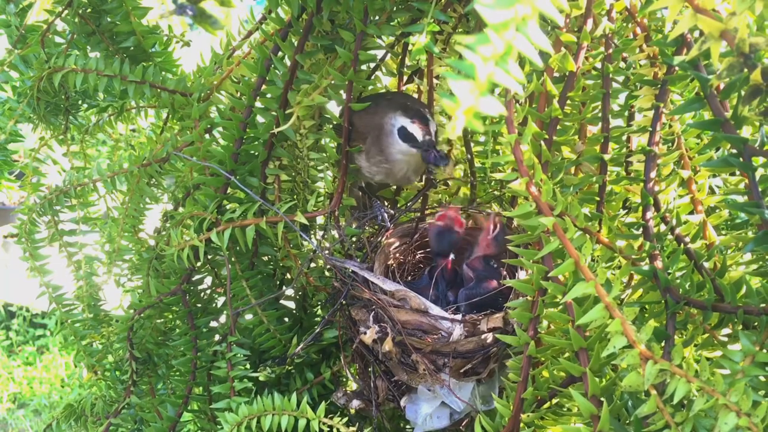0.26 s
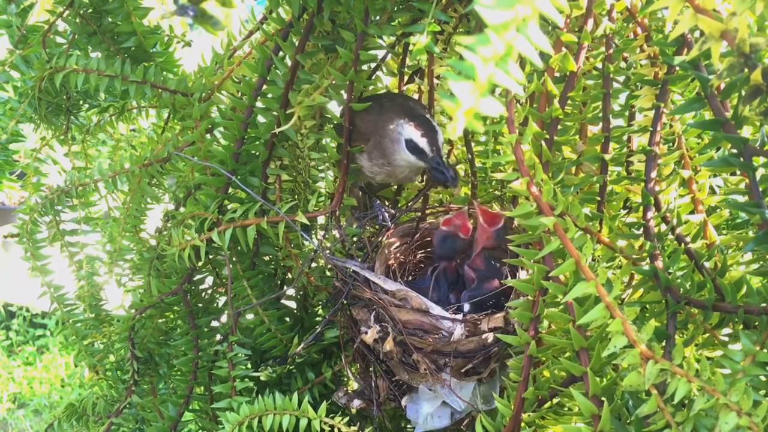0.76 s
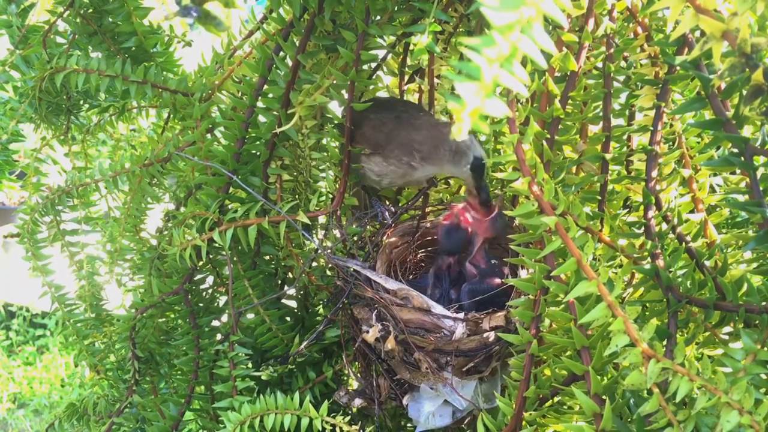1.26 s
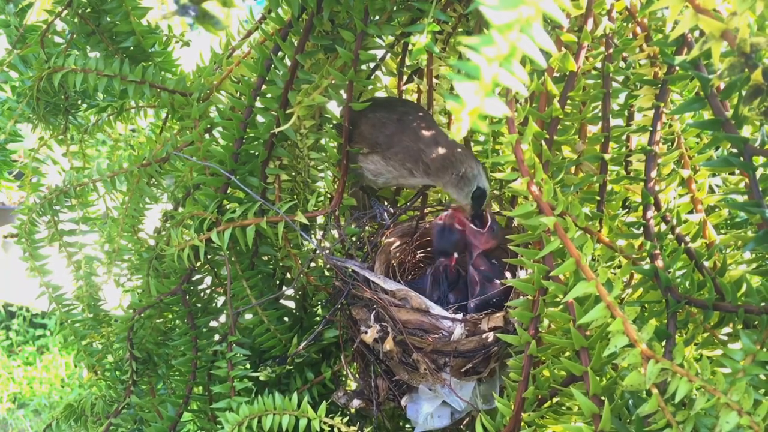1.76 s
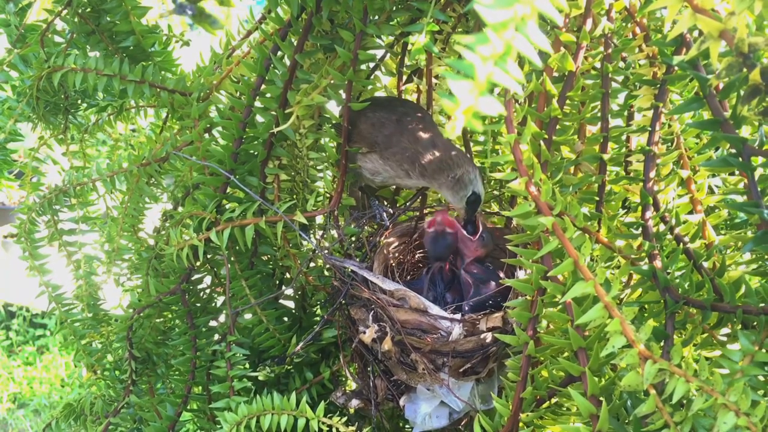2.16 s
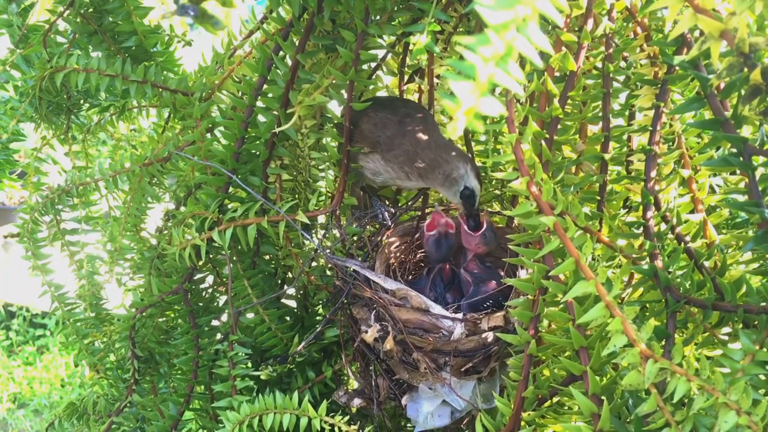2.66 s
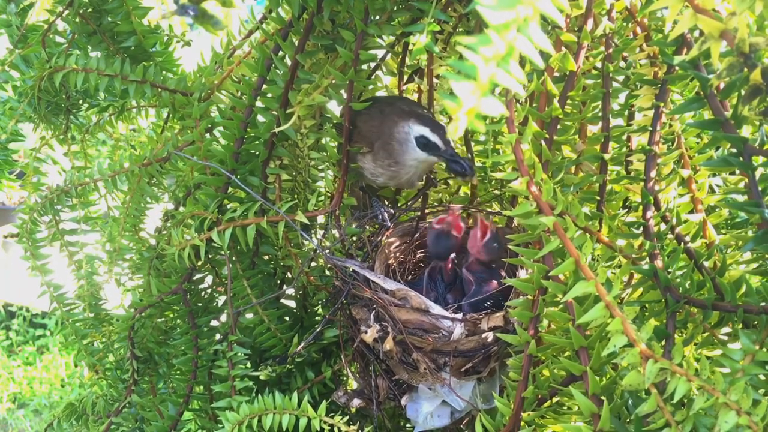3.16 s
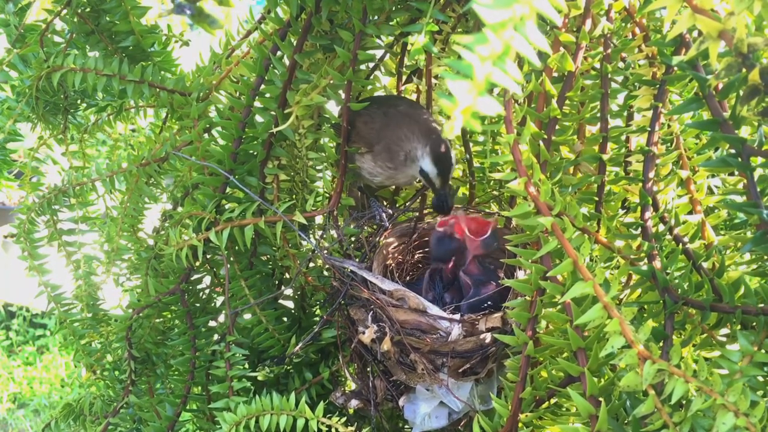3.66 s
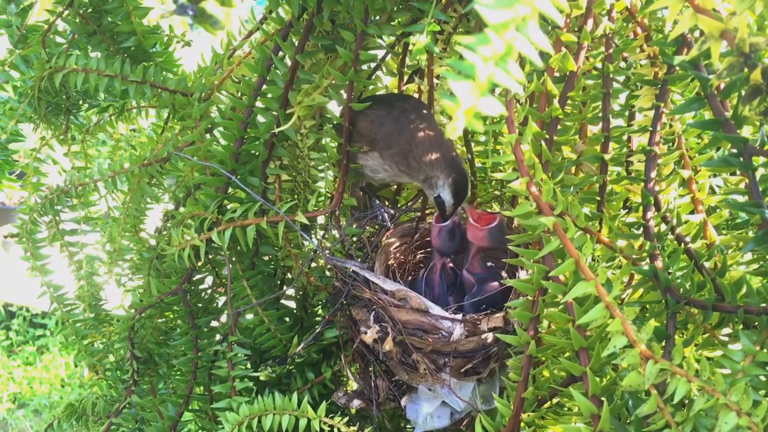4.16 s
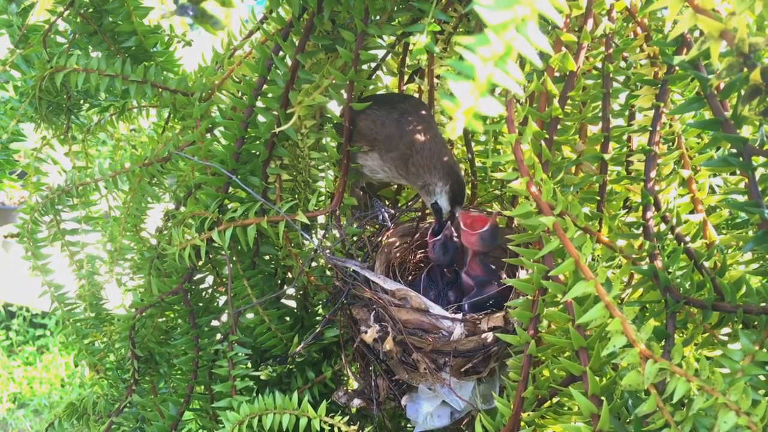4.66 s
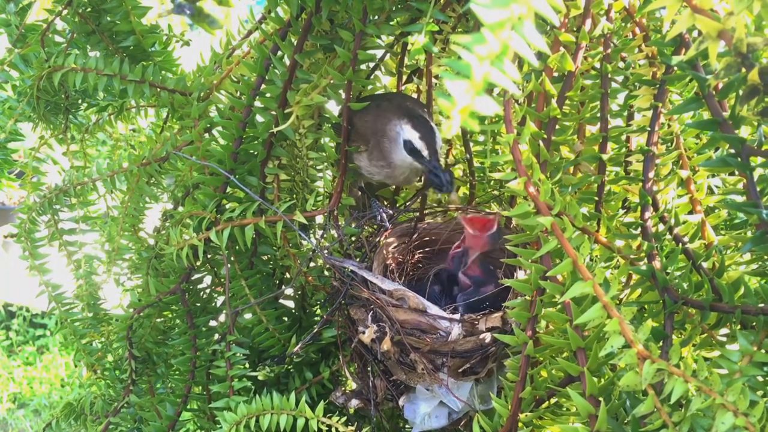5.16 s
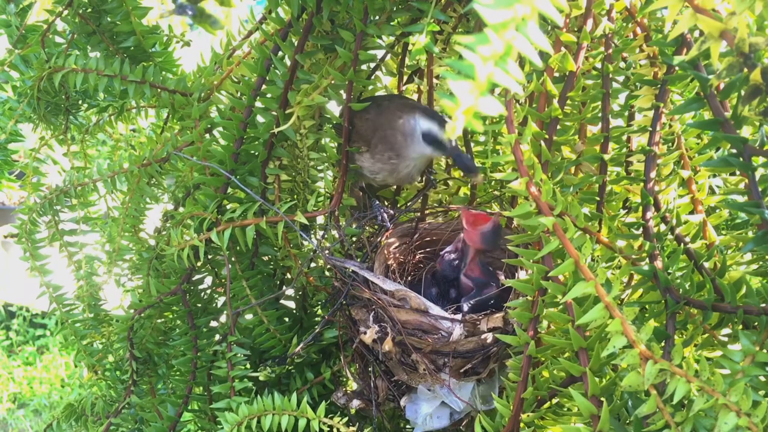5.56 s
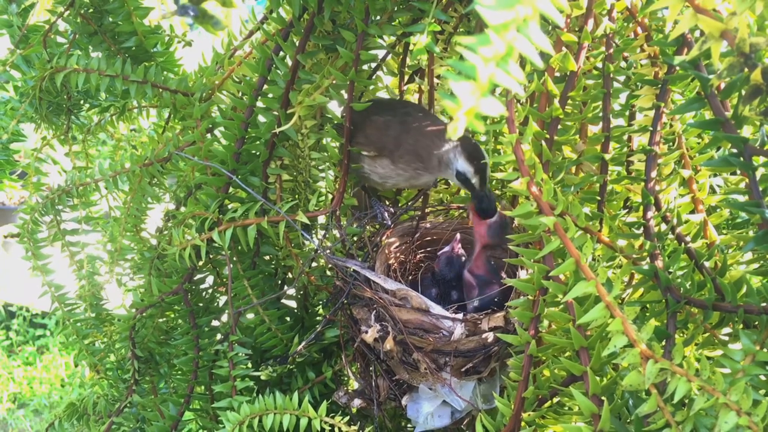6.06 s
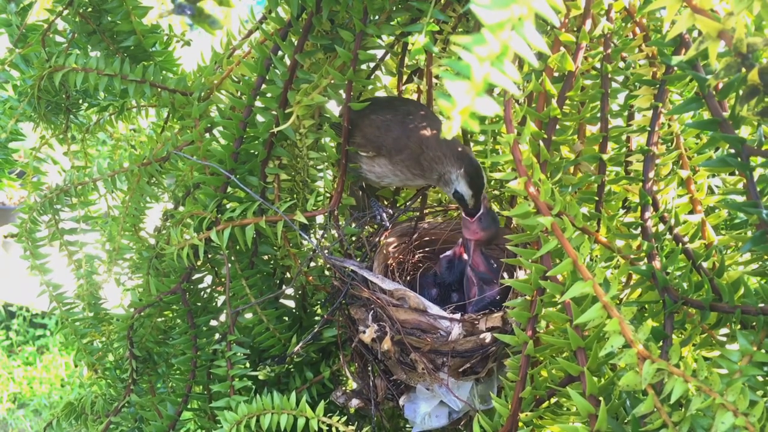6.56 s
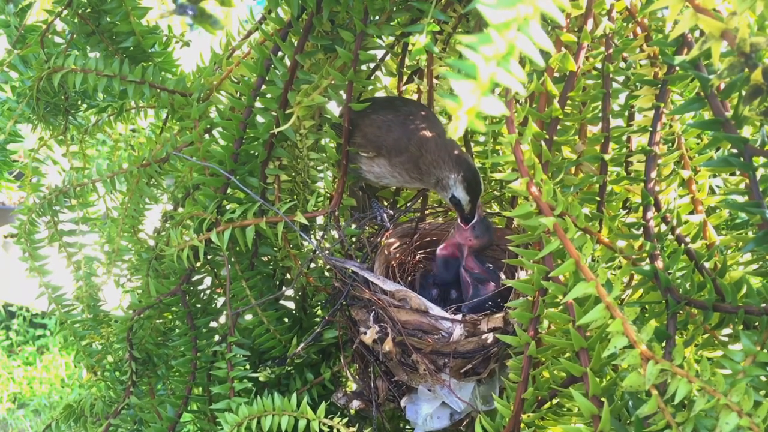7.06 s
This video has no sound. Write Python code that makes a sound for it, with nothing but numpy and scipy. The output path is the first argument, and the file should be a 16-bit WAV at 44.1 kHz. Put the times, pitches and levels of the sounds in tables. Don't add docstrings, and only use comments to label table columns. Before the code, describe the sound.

Two nestlings give thin, high, squeaky begging calls every half second or so over a fast mechanical pump rattle, low traffic rumble and hiss.

```python
import sys
import numpy as np
from scipy import signal
from scipy.fft import rfft, irfft
from scipy.io import wavfile
from scipy.ndimage import uniform_filter1d, map_coordinates

SR = 44100
rng = np.random.default_rng(int(sys.argv[2]) if len(sys.argv) > 2 else 0)


def pcm_store(signal):
    levels = np.round(np.clip(np.atleast_2d(signal), -1, 1) * 32767)
    wavfile.write(sys.argv[1], SR, levels.astype(np.int16).T)


def elevation(decibels):
    levels = np.asarray(decibels, float)
    return 10 ** (levels / 20)


N = 322812
TIME = np.arange(N) / SR
BAND_LIMIT_HZ = 15740
PUMP_HZ = 10.228

# start_s, peak_db, ring_hz, t60_s
PUMP_KNOCKS = [(0.0052, -44, 1430, 0.06), (0.0064, -38.5, 2360, 0.016), (0.0065, -50, 1200, 0.06),
               (0.0149, -40, 2160, 0.016), (0.0157, -45, 810, 0.076), (0.0238, -38.5, 2200, 0.045),
               (0.025, -50, 2460, 0.06), (0.0259, -31, 1460, 0.0072), (0.0283, -46, 1720, 0.06),
               (0.0301, -42, 2350, 0.06), (0.0315, -45, 805, 0.071), (0.0353, -49.5, 694, 0.07),
               (0.0456, -42, 1500, 0.028), (0.0586, -36, 2140, 0.019), (0.0667, -43.5, 800, 0.066),
               (0.0877, -43, 1750, 0.059), (0.0894, -38.5, 2145, 0.069), (0.0898, -47, 1929, 0.12)]
# frequency_hz, density_db (per Hz)
CASING_SPECTRUM = [(300, -4), (1500, -2), (2300, -3), (2800, -5), (3800, -7), (6000, -30)]
# time_s, rumble_db, hum_db
TRAFFIC_LEVELS = [(0.0, -30, -35), (0.08, -35, -33.5), (3.55, -33, -37.5), (3.89, -34, -45),
                  (7.28, -32.5, -44.5), (7.32, -36, -47)]
# frequency_hz, density_db (per Hz)
RUMBLE_SPECTRUM = [(12, -48), (20, -50), (40, -6), (90, 1), (143, -7.5), (172, -13), (201, -13), (255, -24),
                   (600, -43), (780, -49), (1320, -120)]
# frequency_hz, density_db (per Hz)
AIR_SPECTRUM = [(250, 1.5), (600, -5.5), (2200, -4), (3900, -13), (5000, -13), (7500, -12.5), (8600, -8.5),
                (9900, -7.5), (10400, -15), (11000, -8), (15000, -8.5)]
# start_s, length_s, from_hz, to_hz, level_db
FAR_CALLS = [
    (.2, .1, 6100, 6000, -63),
    (.79, .1, 6900, 7000, -59),
    (1.6, .1, 7500, 7300, -61),
    (4.35, .1, 6300, 6100, -63),
]
# time_s, pitch_hz, level_db
FAR_TRILL = [(1.721, 8230, -61), (1.9, 8160, -61), (2.079, 7670, -54), (2.62, 7660, -52),
             (2.661, 7450, -53), (2.92, 7440, -52), (3.001, 7150, -52), (3.2, 6910, -54), (3.55, 6610, -54)]
# start_s, from_hz, to_hz, level_db, gap_hz (other side below when positive, above when
LEADS = [(.434, 3900, 4990, -49.5, 900), (1.1, 4160, 4550, -50, 700), (2.218, 4100, 4650, -41, 380),
         (2.259, 4200, 4850, -44, 330), (2.859, 3890, 4520, -44, 602), (3.458, 4080, 4580, -46, 600),
         (4.047, 4050, 4800, -46.5, 799), (4.627, 4500, 4780, -50, 403), (4.655, 3930, 3900, -47.5, -900),
         (4.686, 3950, 4590, -45.5, -900), (4.938, 5080, 4950, -41, 440), (5.495, 3940, 4780, -51, 699),
         (6.085, 4100, 4900, -53, 600), (6.135, 4410, 4930, -49, -900), (6.332, 5300, 5420, -47.5, 900),
         (6.372, 5400, 5600, -51, 503), (6.394, 5550, 5670, -42, -600), (6.2, 3960, 4920, -49.5, -900),
         (6.968, 4880, 5500, -48, 900)]
# centre_s, length_s, centre_hz, level_db
VOICE_BREAKS = [(0.496, 0.016, 5910, -48), (0.545, 0.025, 5800, -50), (1.172, 0.01, 5920, -41),
                (1.208, 0.014, 6340, -40), (2.899, 0.016, 4900, -47), (2.933, 0.01, 5120, -39.5),
                (2.964, 0.0073, 5540, -41.5), (3.504, 0.012, 5275, -48), (3.545, 0.025, 5380, -43),
                (3.574, 0.01, 5931, -39), (3.964, 0.012, 5574, -50), (4.129, 0.014, 6050, -31),
                (4.162, 0.011, 6130, -32), (4.734, 0.016, 5980, -33), (4.776, 0.015, 5929, -38.5),
                (4.986, 0.02, 5720, -36.5), (5.598, 0.0243, 5870, -32), (5.64, 0.016, 6340, -35.5),
                (6.19, 0.013, 5590, -36), (6.231, 0.011, 5630, -38), (6.411, 0.016, 5880, -47),
                (6.18, 0.021, 5710, -43), (5.578, 0.0095, 5230, -40), (4.089, 0.022, 5280, -43.5),
                (4.704, 0.027, 5330, -44)]
# start_s, crest_hz, level_db, other_hz
STEPS = [(.478, 5150, -46, 4700), (.497, 5730, -38, 4750), (1.152, 5440, -39.5, 4970),
         (1.184, 5930, -30.5, 5460), (1.69, 6040, -50, 4900), (1.705, 5450, -52, 4750),
         (2.296, 5650, -45, 4950), (2.904, 4890, -39.5, 5400), (2.932, 5800, -33, 5100),
         (3.509, 5260, -40, 4890), (3.543, 5740, -33.5, 5070), (4.026, 4400, -47, 3980),
         (4.076, 5180, -49, 4750), (4.099, 5550, -32.5, 5050), (4.134, 6040, -24.5, 5320),
         (4.704, 5580, -35.5, 4980), (4.74, 6030, -26, 5450), (4.962, 5770, -31, 5340),
         (4.987, 5900, -32, 5250), (5.538, 5240, -49, 4900), (5.566, 5520, -43, 5020),
         (5.607, 5790, -27, 5020), (6.174, 6140, -37, 5360), (6.21, 5740, -30.5, 6420),
         (6.232, 5900, -29.5, 5470)]
# start_s, crest_hz, level_db, other_hz, fall_hz_per_s
ARCHES = [(.53, 6220, -40, 4800, 22000), (1.211, 6280, -32, 5020, 13000), (1.72, 6040, -50, 4950, 30000),
          (2.32, 5920, -45, 4960, 20000), (2.966, 6350, -35.5, 4870, 38000),
          (3.573, 6370, -36.5, 5000, 30000), (4.162, 6520, -31.5, 4910, 20000),
          (4.771, 6530, -32, 5140, 18000), (4.997, 6250, -32.5, 5380, 19000),
          (5.637, 6600, -28.5, 5860, 5000), (6.244, 6550, -39, 5300, 26000),
          (6.412, 5900, -48, 6500, -3000), (7.015, 5750, -48.5, 5000, -9000)]
# peak_s, level_db, opening_db_per_s, closing_db_per_s
GAPES = [(0.538, -39, 300, 570), (2.914, -38, 300, 1100), (3.556, -33.5, 270, 470), (4.054, -50, 700, 290),
         (4.692, -46, 350, 400), (4.958, -51, 400, 300), (6.412, -41, 400, 470), (1.125, -54.5, 200, 300)]
# offset_s (from its peak), pitch_ratio, lower_db, upper_db
ZIGZAG_SHAPE = [(-.062, .84, -16, -30), (-.052, .88, -1.5, -12), (-.038, .865, -4, -14),
                (-.029, .93, 3, 0.5), (-.011, .89, -0.5, -16), (0, 1, 6, -5), (.011, .935, -3, -4),
                (.025, 0.99, 0, -8), (.036, 0.87, -15, -23)]
# peak_s, peak_hz, level_db, upper_side_db, stretch (time ratio)
ZIGZAG_CALLS = [
    (.627, 5450, -53.5, -2, 1.03),
    (1.846, 5550, -51.5, 0, 1.1),
    (2.504, 5470, -50, -2, 1.03),
    (3.293, 5650, -47, 1, 1),
    (3.981, 6240, -44, 3, 1.13),
]
# centre_s, length_s, level_db
RUSTLES = [
    (.52, .06, -56),
    (1.27, .1, -49),
    (4.575, .015, -53),
    (5.57, .05, -55),
    (6.2, .15, -53),
]
# frequency_hz, density_db
LEAF_SPECTRUM = [(1500, -5), (3500, 7), (7000, 2), (15500, -5)]
# start_s, length_s, from_hz, to_hz, level_db
SQUEAKS = [
    (2.23, .045, 13000, 14300, -55),
    (3.468, .035, 12900, 13900, -56),
    (3.512, .045, 15500, 14400, -49),
    (2.929, .009, 8200, 8200, -47),
    (6.335, .035, 10700, 10850, -50),
]
# start_s, peak_db, ring_hz, t60_s
TWIG_CLICK = [
    (5.521, -28, 1550, .012),
]
# frequency_hz, density_db
BREEZE_SPECTRUM = [(8000, -20), (11000, 0), (15500, 0)]

JOIN_S = .003
LEAD_SWELL_DB, LEAD_SHY_DB = 6.5, 3.5
SCOOP_HZ, LOW_SCOOP_HZ, ARCH_SCOOP_HZ, SCOOP_DB = 543, 756, 352, 9
STEP_RISE_S, STEP_SAG_HZ_S, LOW_SAG_HZ_S = .00803, 1500, 8800
STEP_FADE_DB, LOW_FADE_DB = 2, 10.5
DIVE_S, DIVE_HZ, LOW_DIVE_HZ, DIVE_DB = .01, 400, 850, 8
ARCH_RISE_S, ARCH_S, RELEASE_S = .009, .047, .012
ARCH_S_PER_DB = .0007
ARCH_FADE_DB, RELEASE_DB = 3, 20
ROUNDING = .6
ARCH_LOW_FALL_HZ_S = 15000
EVEN_GAP_HZ, LOW_DB_PER_KHZ = 370, 19
CROSS_DB, CROSS_BREAK_DB = -28, 26
SHUT_DB = -58


def unit(x):
    return x / np.sqrt(np.mean(np.abs(x) ** 2) + 1e-20)


def coloured(spectrum, size):
    frequency_hz, density_db = np.transpose(spectrum)
    hz = np.fft.rfftfreq(size, 1 / SR)
    gain_db = np.interp(np.log(hz + 1), np.log(frequency_hz), density_db, left=-120)
    gain = elevation(gain_db) * (hz < BAND_LIMIT_HZ)
    return unit(irfft(rfft(rng.standard_normal(size)) * gain, size))


def wobble(rate, size=N):
    knots = rng.standard_normal(int(size * rate / SR) + 4)
    return map_coordinates(knots, [np.arange(size) * rate / SR])


def phasor(hz):
    return np.exp(2j * np.pi * np.cumsum(hz) / SR)


def pump():
    knocks = np.zeros(N)
    for start_s, peak_db, ring_hz, t60_s in PUMP_KNOCKS:
        age = (TIME - start_s) % (1 / PUMP_HZ)
        onset = 1 - np.exp(-age / 0.00074)
        knocks += elevation(peak_db - 60 * age / t60_s) * onset * np.sin(2 * np.pi * ring_hz * age)
    size = round(SR / PUMP_HZ)
    cycle = coloured(CASING_SPECTRUM, size)
    rattle = map_coordinates(cycle, [TIME * PUMP_HZ % 1 * size], mode="grid-wrap")
    rattle_db = -53 + 2 * np.cos(2 * np.pi * PUMP_HZ * (TIME - .02))
    return knocks + elevation(rattle_db) * rattle


def traffic():
    time_s, rumble_db, hum_db = np.transpose(TRAFFIC_LEVELS)
    hum_level = elevation(np.interp(TIME, time_s, hum_db) + 2.5 + 1.6 * wobble(5))
    hum = hum_level * phasor(65 + 1.2 * wobble(4)).real
    rumble_level = elevation(np.interp(TIME, time_s, rumble_db) - 2.0 + 0.7 * wobble(4.22))
    return hum + rumble_level * coloured(RUMBLE_SPECTRUM, N)


def air():
    breath_db = 0.5 * np.cos(2 * np.pi * PUMP_HZ * (TIME - .022))
    return elevation(-45 + breath_db + 0.4 * wobble(3.13)) * coloured(AIR_SPECTRUM, N)


def whistles(table, waver_hz):
    out = np.zeros(N)
    for start_s, length_s, from_hz, to_hz, level_db in table:
        n = int(length_s * SR)
        tone = phasor(np.linspace(from_hz, to_hz, n) + waver_hz * wobble(304, n)).real
        level = elevation(level_db + 7 + 4 * wobble(200, n))
        out[int(start_s * SR):][:n] += level * np.hanning(n) * tone
    return out


def far_birds():
    time_s, pitch_hz, level_db = np.transpose(FAR_TRILL)
    beat = 1 + 0.52 * np.sin(2 * np.pi * 46 * TIME + 3.4 * wobble(8.9))
    level = elevation(np.interp(TIME, time_s, level_db, left=-120, right=-120))
    trill = level * beat * phasor(np.interp(TIME, time_s, pitch_hz) + 60 * wobble(60)).real
    direct = trill + whistles(FAR_CALLS, waver_hz=298)
    tail = rng.standard_normal(SR // 2) * elevation(-60 * TIME[:SR // 2] / 0.22)
    echoes = signal.fftconvolve(direct, tail / np.linalg.norm(tail))[:N]
    return .5 * direct + 1.65 * echoes


def other_db(level_db, gap_hz):
    return level_db - LOW_DB_PER_KHZ * max(abs(gap_hz) - EVEN_GAP_HZ, 0) / 1000


def lead(start_s, end_s, dives, from_hz, to_hz, level_db, gap_hz):
    points = [(start_s, from_hz, level_db - LEAD_SWELL_DB),
              ((start_s + end_s) / 2, (from_hz + to_hz) / 2, level_db),
              (end_s, to_hz, level_db - LEAD_SHY_DB)]
    return [(t, hz, db, hz - gap_hz, other_db(db, gap_hz) - LEAD_SHY_DB) for t, hz, db in points]


def voice_breaks():
    flutter = unit(wobble(1700) + 1j * wobble(1700) + .5 * wobble(5500)) * elevation(2.2 * wobble(200))
    voice, power = np.zeros(N, complex), np.full(N, elevation(-125))
    for centre_s, length_s, centre_hz, level_db in VOICE_BREAKS:
        span = slice(int((centre_s - 3 * length_s) * SR), int((centre_s + 3 * length_s) * SR))
        swell = elevation(level_db) * np.exp(-((TIME[span] - centre_s) / length_s) ** 2)
        voice[span] += swell * flutter[span] * np.exp(2j * np.pi * centre_hz * TIME[span])
        power[span] += swell ** 2
    return voice, power


def step(start_s, end_s, dives, hz, db, low_hz):
    low_db = other_db(db, hz - low_hz)
    rise = min(STEP_RISE_S, (end_s - start_s) / 2)
    dive = dives * min(DIVE_S, (end_s - start_s - rise) / 2)
    held = end_s - start_s - rise - dive
    sagged = np.array([end_s - dive, hz - STEP_SAG_HZ_S * held, db - STEP_FADE_DB,
                       low_hz - LOW_SAG_HZ_S * held, low_db - LOW_FADE_DB])
    dropped = sagged + dives * np.array([dive, -DIVE_HZ, -DIVE_DB, -LOW_DIVE_HZ, 0])
    scooped = (start_s, hz - SCOOP_HZ, db - SCOOP_DB, low_hz - LOW_SCOOP_HZ, low_db - SCOOP_DB)
    return [scooped, (start_s + rise, hz, db, low_hz, low_db), sagged, dropped]


def arch(start_s, end_s, dives, hz, db, low_hz, fall):
    low_db = other_db(db, hz - low_hz)
    tail = ARCH_S - ARCH_RISE_S + ARCH_S_PER_DB * (db + 30)
    after = [(0, 1, 0), (tail / 3, ROUNDING, 0), (tail - RELEASE_S, 1, ARCH_FADE_DB), (tail, 1, RELEASE_DB)]
    rows = [(start_s, hz - ARCH_SCOOP_HZ, db - ARCH_FADE_DB, low_hz, low_db)]
    for t, share, loss in after:
        rows.append((start_s + ARCH_RISE_S + t, hz - share * fall * t, db - loss,
                     low_hz - share * ARCH_LOW_FALL_HZ_S * t, low_db - loss))
    return rows


def calls():
    kinds = [(lead, LEADS), (step, STEPS), (arch, ARCHES)]
    parts = sorted([(row, kind) for kind, table in kinds for row in table], key=lambda part: part[0][0])
    out = [[]]
    for ((start_s, *row), kind), (following, next_kind) in zip(parts, parts[1:] + parts[-1:]):
        dives = next_kind is not arch
        out[-1] += kind(start_s, following[0] - JOIN_S, dives, *row)
        if kind is arch:
            out.append([])
    return out[:-1]


def zigzags():
    return [[(peak_s + offset_s * stretch, peak_hz * ratio + 620, level_db + upper_db + side_db,
              peak_hz * ratio, level_db + lower_db) for offset_s, ratio, lower_db, upper_db in ZIGZAG_SHAPE]
            for peak_s, peak_hz, level_db, side_db, stretch in ZIGZAG_CALLS]


def sing(call, voice, power):
    time_s, *columns = np.transpose(call)
    span = slice(int(time_s[0] * SR), int(time_s[-1] * SR))
    upper_hz, upper_db, lower_hz, lower_db = (
        uniform_filter1d(np.interp(TIME[span], time_s, column), size=150) for column in columns)
    n = len(upper_hz)
    weakness_db = np.clip((-42 - np.maximum(upper_db, lower_db)) / 4, 0, 2.5)
    edge = signal.windows.tukey(n, 300 / n) * elevation(weakness_db * wobble(180, n))
    loud = elevation(2 * upper_db) + elevation(2 * lower_db)
    broken = power[span] / (power[span] + loud)
    shake_hz = 20 + 280 * broken
    upper = phasor(upper_hz + shake_hz * wobble(250, n))
    lower = phasor(lower_hz + shake_hz * wobble(250, n))
    cross = elevation((upper_db + lower_db) / 2 + CROSS_DB + CROSS_BREAK_DB * broken)
    cross_tones = upper ** 2 / lower + lower ** 2 / upper
    voice[span] += edge * (elevation(upper_db) * upper + elevation(lower_db) * lower + cross * cross_tones)
    power[span] += loud


def nestlings():
    voice, power = voice_breaks()
    for call in calls() + zigzags():
        sing(call, voice, power)
    octave = elevation(SHUT_DB)
    for peak_s, level_db, opening, closing in GAPES:
        octave = octave + elevation(level_db - np.maximum(opening * (peak_s - TIME), closing * (TIME - peak_s)))
    squared = 2 * voice ** 2 / (power + np.abs(voice) ** 2)
    return np.sqrt(2) * (voice + octave * squared).real


def leaves():
    gusts = sum(elevation(level_db) * np.exp(-((TIME - centre_s) / length_s) ** 2)
                for centre_s, length_s, level_db in RUSTLES)
    grain_db = 2 * wobble(90)
    return gusts * elevation(grain_db) * coloured(LEAF_SPECTRUM, N)


def squeaks():
    return whistles(SQUEAKS, waver_hz=198)


def twig():
    start_s, peak_db, ring_hz, t60_s = TWIG_CLICK[0]
    age = np.clip(TIME - start_s, 0, None)
    modes = np.sin(2 * np.pi * ring_hz * age) + .5 * np.sin(2 * np.pi * 420 * age)
    return elevation(peak_db - 60 * age / t60_s) * modes


def breeze():
    start_s, rise_s, level_db = 5.9, .15, -57
    rise = 1 / (1 + np.exp((start_s - TIME) / rise_s))
    return elevation(level_db) * rise * coloured(BREEZE_SPECTRUM, N)


def scene():
    background = pump() + traffic() + air() + far_birds()
    return (background + nestlings() + leaves() + squeaks() + twig() + breeze())[None]


def roll_off(x):
    return signal.sosfilt(signal.butter(12, 16590, fs=SR, output="sos"), x)


def record(dry):
    passed = np.fft.rfftfreq(N, 1 / SR) < BAND_LIMIT_HZ
    mix = irfft(rfft(dry) * passed, N)
    return roll_off(mix)


dry = scene()
out = record(dry)
pcm_store(out)
```